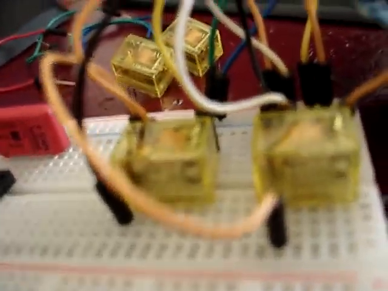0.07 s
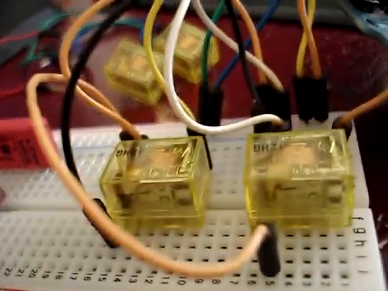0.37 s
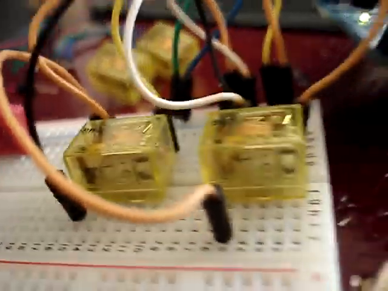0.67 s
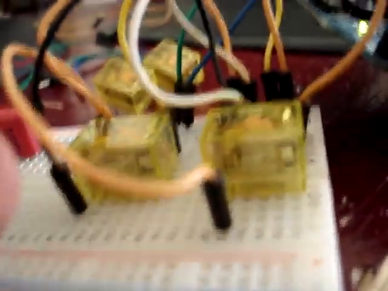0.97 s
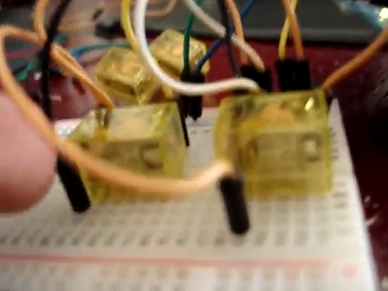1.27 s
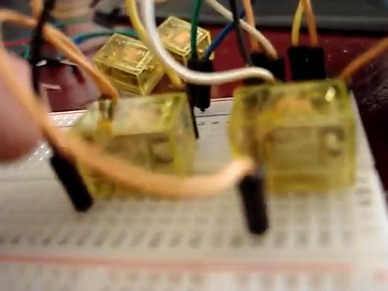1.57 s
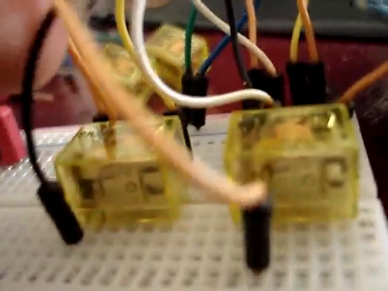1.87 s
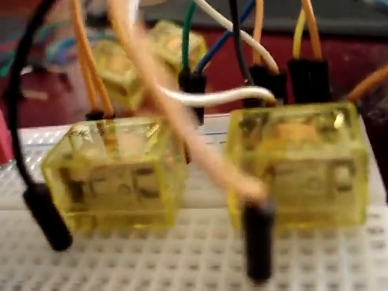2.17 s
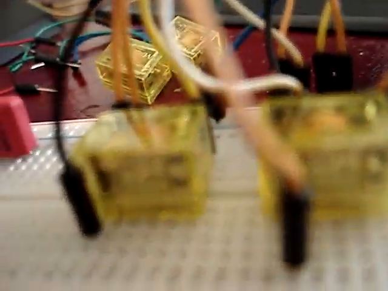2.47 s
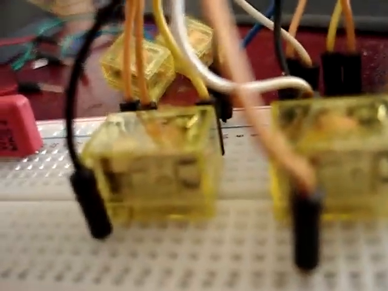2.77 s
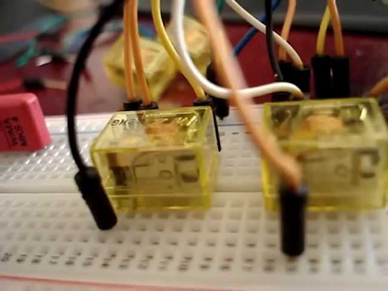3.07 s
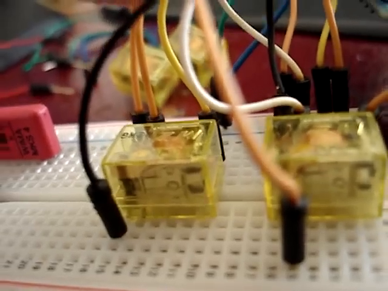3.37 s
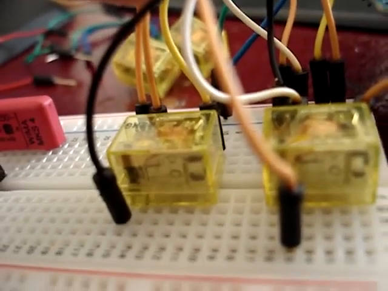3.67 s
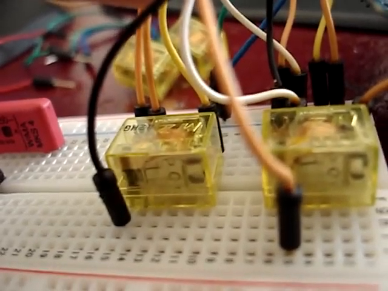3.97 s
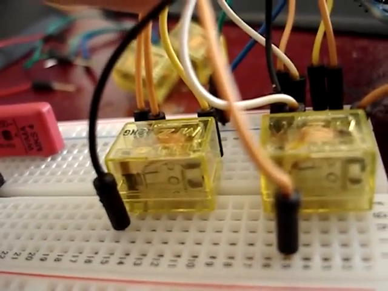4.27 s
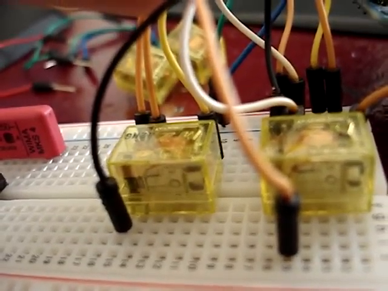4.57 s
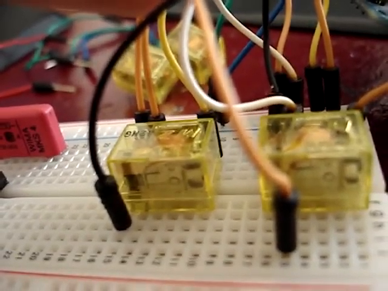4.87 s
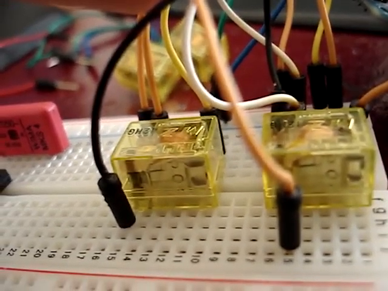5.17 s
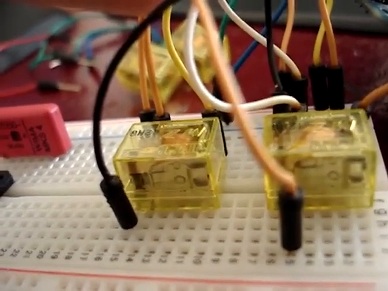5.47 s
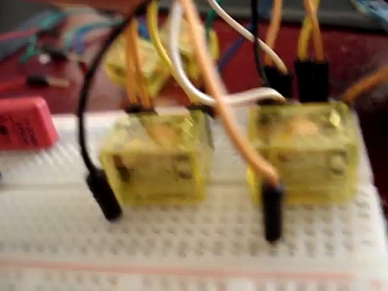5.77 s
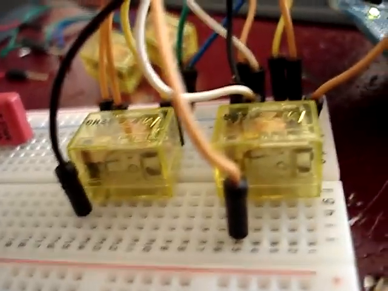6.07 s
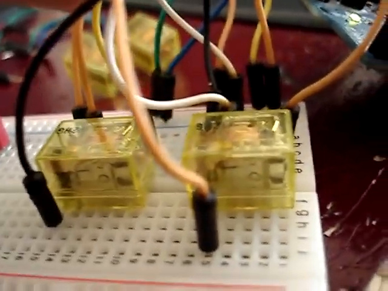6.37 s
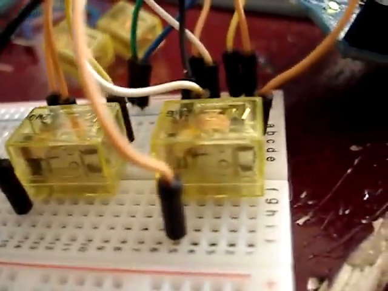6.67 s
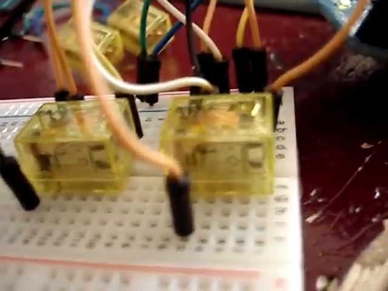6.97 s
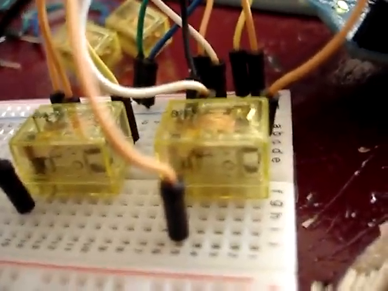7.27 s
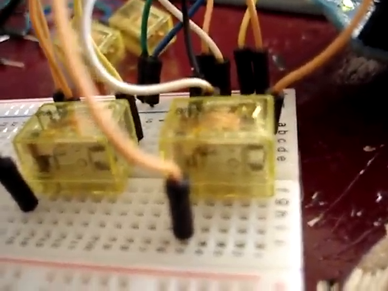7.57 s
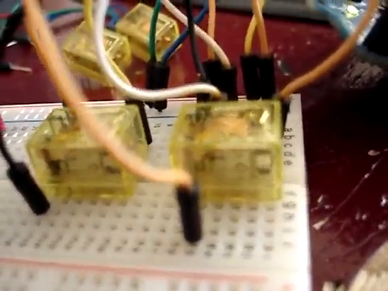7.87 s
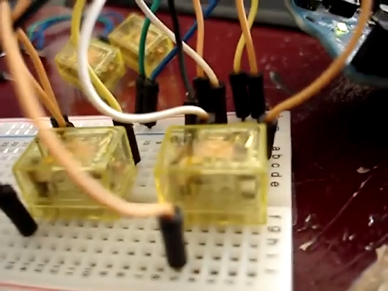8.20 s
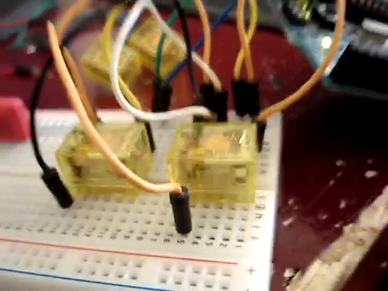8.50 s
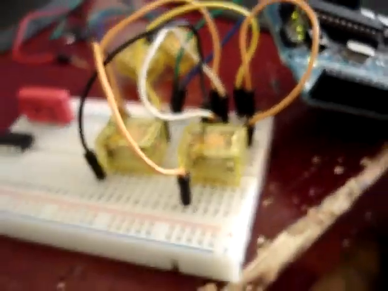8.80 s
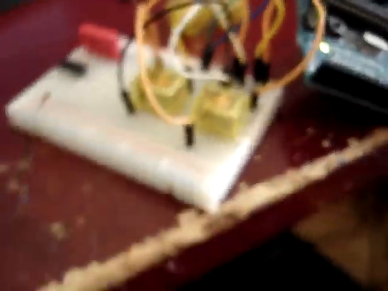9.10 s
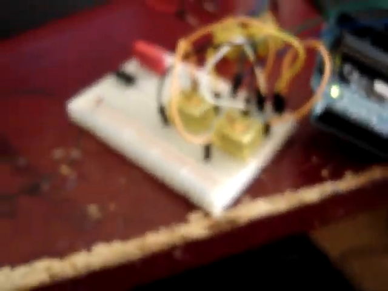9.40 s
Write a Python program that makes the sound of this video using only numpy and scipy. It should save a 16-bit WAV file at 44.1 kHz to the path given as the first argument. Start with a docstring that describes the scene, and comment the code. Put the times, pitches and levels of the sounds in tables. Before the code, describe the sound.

Two small relays switch each other rapidly in a continuous harsh, rattling buzz that stumbles now and then, with one sharp knock near the end.

```python
"""A quiet room, close on a breadboard: two small relays switch each other about 77 times a second.
In every cycle the contacts snap shut and bounce, the armature hits its stop and rattles the plastic
case, and the board knocks. The buzz stumbles whenever an armature sticks, and its colour shifts as the
hand-held microphone moves. Near the end comes one sharp knock; a low rumble lies under it all."""
import sys
import numpy as np
from scipy import signal
from scipy.fft import rfft, irfft
from scipy.io import wavfile

SR = 44100
rng = np.random.default_rng(int(sys.argv[2]) if len(sys.argv) > 2 else 0)


def transcribe(u):
    """Save the signal u as a 16-bit wav file named by the first command-line argument.

    u: samples, shape (n,) or (channels, n), limited to [-1, 1]; the rate is SR.
    q: integer samples, one column per channel.
    """
    v = np.clip(np.atleast_2d(u).T, -1, 1)
    q = np.round(v * 32767).astype(np.int16)
    wavfile.write(sys.argv[1], SR, q)


N = 425124
TIME = np.arange(N) / SR

# Colour of the room tone: frequency_hz, relative_db
RUMBLE_SPECTRUM = [(15, -4.5), (30, 2.5), (48, -7.5), (70, -2.5), (110, -6), (200, -11), (400, -10),
                   (1000, -11), (4000, -19), (10000, -36)]
# The hand-held move: time_s, facing (0 beside the cases, 1 in front), back (0 close, 1 drawn back)
MIC_PATH = [(0, 0.26, 0.32), (.9, 0.059, 0.3), (1.55, 0.13, 0.033), (2.9, 0.53, 0.058), (3.2, 0.68, 0.16),
            (6.8, 0.79, 0.21), (7.7, 0.56, 0.28), (8.2, 0.42, 0.14), (8.8, 0.24, 0.8), (9.25, 0.36, 0.7)]
# The lone knock: start_s, peak_db
KNOCK_HITS = [(9.015, -12)]
# The plastic it rings in: pitch_hz, width_hz, relative_db
KNOCK_RESONANCES = [(900, 350, -14), (1370, 680, -4), (1780, 380, 5.5), (2300, 600, -1), (3600, 270, -6),
                    (4580, 280, 5), (5430, 290, 6)]
# Cycle length while the armatures move freely: time_s, period_ms
FREE_CYCLE = [(0.0, 12.878), (0.71, 12.787), (1.33, 12.749), (1.99, 12.378), (2.25, 13.421), (2.94, 12.231),
              (3.79, 12.467), (4.22, 13.1), (5.16, 13.176), (6.14, 13.331), (7.37, 12.978), (8.5, 13.196),
              (9.64, 13.433)]
# Spells in which an armature sticks: start_s, length_s, lost_per_cycle_ms
STICKING_SPELLS = [(0.21, 0.06, 1.35), (2.35, 0.09, 1.97), (2.65, 0.04, 2.54), (4.52, 0.097, 0.65),
                   (5.15, 0.047, 2.53), (5.32, 0.622, 1.05), (6.56, 0.065, 0.91), (6.89, 0.132, 1.85),
                   (7.86, 0.465, 1.55), (8.66, 0.307, 1.24), (9.09, 0.294, 0.7), (9.45, 0.13, 1.93)]
# How hard the armature shakes board and cases, taken against its median: time_s, level_db
SHAKE_CURVE = [(0.04, -50), (0.52, -50), (1.15, -45), (1.6, -50), (2.72, -52.5), (3.12, -51), (6.1, -49),
               (8.41, -49.5), (8.68, -48.5), (9.58, -46)]
# Body of the breadboard: pitch_hz, width_hz, relative_db, back_boost_db
BOARD_RESONANCES = [(759, 52, 3, 0), (913, 137, 1, 3.5), (1068, 50, 10, 2)]
# The armature's blows in one cycle: delay_ms, strength_db, scatter_ms,
# spot (1 drives neighbouring modes together, -1 against each other)
ARMATURE_HITS = [(-0.82, -10, .01, 0.74), (0.41, 6, .085, -0.21), (.78, -13, .13, 0.36),
                 (2.1, -10, .07, 0.26), (4, -17, .25, 0.8)]
# Ring of the plastic cases: pitch_hz, width_hz, side_gain_db, front_boost_db, back_boost_db
CASE_RESONANCES = [(1546, 150, -22, 7.5, -10), (1805, 127, -3, 0, -3), (2174, 223, -12.5, -11.5, -2.5),
                   (2181, 34, 2.5, -8.5, 0.5), (2628, 330, -6.5, -4, -1.5), (2976, 142, 1, 3, -4),
                   (3193, 128, -16.5, 12, -4.5), (3688, 120, 2, 4, 2), (3705, 270, -10, .5, -0.3),
                   (4142, 89, 8.5, -3.5, 0.5), (4242, 108, -4, 1, -8), (4597, 167, 0, 3.5, -6.5),
                   (4930, 99, -11.5, -7, -2), (5374, 147, 7.5, -6, -3), (5920, 120, -13.5, 11.5, -11),
                   (6040, 111, -19, -12, 17)]
# The case ring near 4 kHz swells and fades: time_s, gain_db
CASE_SWELL = [(0.15, 1), (0.45, -1.5), (1.3, 1), (1.7, -2.5), (2.7, -2), (3.15, 0), (3.7, -3), (4.4, -0.5),
              (7.5, -0.5), (7.9, -2), (9.2, 1.5), (9.5, 4)]
# Faint lead-in, contact snap and bounce: delay_ms, strength_db, scatter_ms, spot (as for the armature)
CONTACT_HITS = [(-2, -16.5, 0.66, 0.38), (-0.9, -10.5, .05, 1), (0.37, 4, .07, 0), (1.37, -0.3, .23, 0)]
# Contact springs: pitch_hz, width_hz, side_gain_db, front_boost_db, back_boost_db, snap_follow_ratio
SPRING_RESONANCES = [(6850, 67, -15, 1, -10, 0.21), (7250, 180, 6, -2.3, 6, 0.47),
                     (7850, 113, -13, -1, -1, 0.25), (8150, 212, 15, 1.9, -2, 0.3),
                     (8810, 215, 1.03, 1.5, 0.5, 0.39), (9012.0, 330, 6, 0, -5, 0.68),
                     (9430, 265, 2.5, 1.7, -2, 1.8), (9720, 180, 14, -9.5, 3.5, 0.88)]
# How hard the contacts snap, taken against its median: time_s, level_db
SNAP_CURVE = [(0.04, -37.5), (1.39, -36), (1.82, -40.5), (2.19, -37.5), (2.8, -44), (3.2, -41.5),
              (3.86, -43.5), (3.97, -38.5), (8.04, -38), (9.07, -37), (9.37, -39.5), (9.58, -37)]


def from_db(db):
    """Decibels to gain."""
    return 10 ** (np.asarray(db) / 20)


def unit_rms(x):
    """Scale to unit power."""
    return x / np.sqrt(np.mean(x ** 2) + 1e-20)


def automation(rows):
    """Each column of a timed curve, sample by sample."""
    times, *columns = np.transpose(rows)
    return [np.interp(TIME, times, column) for column in columns]


def swing(curve):
    """A level curve as dB above or below its median."""
    db, = automation(curve)
    return db - np.median(db)


def wander(count, memory):
    """Random values of unit power, each carrying over into the next few."""
    return unit_rms(signal.lfilter([1], [1, -memory], rng.standard_normal(count)))


def drift(times, per_s):
    """Slow modulation: straight lines between random values, read at the given moments."""
    return np.interp(times * per_s, np.arange(1000), rng.standard_normal(1000))


def band(x, low_hz, high_hz, order):
    """Causal band-pass."""
    return signal.sosfilt(signal.butter(order, [low_hz, high_hz], "band", fs=SR, output="sos"), x)


def resonance(x, hz, width_hz):
    """One ringing mode: two poles, gain 1 at the peak."""
    r = np.exp(-np.pi * width_hz / SR)
    feedback = [1, -2 * r * np.cos(2 * np.pi * hz / SR), r * r]
    return signal.lfilter(np.array([1, 0, -1]) * (1 - r * r) / 2, feedback, x)


def clicks(times, gains):
    """One-sample blows at the given moments."""
    at = np.round(times * SR).astype(int)
    inside = (at >= 0) & (at < N)
    return np.bincount(at[inside], gains[inside], N) + 1e-18


def scattered(cycles, delay_ms, scatter_ms):
    """One loosely timed moment per cycle, in seconds."""
    return cycles + (delay_ms + scatter_ms * rng.standard_normal(len(cycles))) / 1000


def jolts(times, uneven_db):
    """A train of blows, never quite equally strong."""
    return clicks(times, from_db(uneven_db * rng.standard_normal(len(times))))


def bounces(cycles, hits, spread_offset_db, spread_db_per_ms, cycle_db=0):
    """Blows felt by the even and the odd modes; loosely timed bounces also vary most in strength."""
    even, odd = 0, 0
    for delay_ms, db, scatter_ms, spot in hits:
        times = scattered(cycles, delay_ms, scatter_ms)
        spread_db = spread_offset_db + spread_db_per_ms * scatter_ms
        force_db = db + cycle_db + spread_db * rng.uniform(-1, 1, len(cycles))
        blows = clicks(times, from_db(force_db))
        even, odd = even + blows, odd + spot * blows
    return even, odd


def room_rumble(level_db=-57):
    """The bed: steady low noise of the room."""
    hz, db = np.transpose(RUMBLE_SPECTRUM)
    grid_hz = np.maximum(np.arange(N // 2 + 1) * SR / N, 1)
    colour = from_db(np.interp(np.log(grid_hz), np.log(hz), db))
    return from_db(level_db) * unit_rms(irfft(rfft(rng.standard_normal(N)) * colour, N))


def room_tail(direct, t60_s=0.68, predelay_s=0.004, send_db=-19.5):
    """A faint, dull tail from the walls fills the gaps between the clicks."""
    t = TIME[:SR // 2]
    tail = rng.standard_normal(len(t)) * from_db(-60 * t / t60_s) * (t > predelay_s)
    wet = signal.fftconvolve(direct, tail / np.linalg.norm(tail))[:N]
    return from_db(send_db) * band(wet, 78, 4500, order=2)


def knock(rebound_ms=2.18, rebound_db=-13):
    """One hard tap on plastic, with a small rebound."""
    times, db = np.transpose(KNOCK_HITS)
    blows = clicks(times, from_db(db)) + clicks(times + rebound_ms / 1000, from_db(db + rebound_db))
    ring = sum(from_db(mode_db) * resonance(blows, hz, width) for hz, width, mode_db in KNOCK_RESONANCES)
    tap = band(ring, 300, 5500, order=3)
    return tap / np.abs(tap).max() * from_db(db.max())


def switching_times(jitter_ms=0.13, waver_ms=0.28, stumble_share=0.4):
    """The rhythm of the buzz: a little unsteady, slower and more ragged while an armature sticks."""
    free_ms, = automation(FREE_CYCLE)
    lost_ms = sum(ms * ((TIME >= start) & (TIME < start + length))
                  for start, length, ms in STICKING_SPELLS)
    turns = np.cumsum(1000 / (free_ms + lost_ms)) / SR
    times = np.interp(np.arange(1, int(turns[-1]) + 1), turns, TIME)
    stumble_ms = stumble_share * np.interp(times, TIME, lost_ms) * wander(len(times), memory=0.7)
    unsteady_ms = jitter_ms * wander(len(times), memory=0.55) + waver_ms * drift(times, per_s=9)
    return times + (unsteady_ms + stumble_ms - 2.5) / 1000   # opens 2.5 ms into the first cycle


def recoil(cycles, hum_db=-60, thud_db=-63, tap_db=-59.5, panel_db=-68):
    """Each pull-in jolts the relay: hum at the switching rate, a thud, a tap and one low board mode."""
    blows = jolts(cycles - 0.38 / 1000, uneven_db=2.14)
    _, back = automation(MIC_PATH)
    waver_db = 1.2 * drift(TIME, per_s=7.4)
    hum = from_db(hum_db + waver_db) * unit_rms(band(blows, 64, 168.7, order=2))
    thud = from_db(thud_db) * unit_rms(band(blows, 128.5, 361, order=2))
    tap = from_db(tap_db) * unit_rms(band(blows, 707, 1308, order=3))
    panel = from_db(panel_db) * unit_rms(resonance(blows, 391, 93))
    # Drawing back thins the hum, softens thud and tap, and brings up the board mode.
    return from_db(-13 * back) * hum + from_db(-4 * back) * (thud + tap) + from_db(5 * back) * panel


def board_knocks(cycles, shake_db, level_db=-50):
    """The armature's blow reaches the breadboard a little unevenly; its close modes swell and die fast."""
    arrivals = scattered(cycles, delay_ms=0.04, scatter_ms=0.1)
    blows = jolts(arrivals, uneven_db=1.5)
    _, back = automation(MIC_PATH)
    body = sum((-1) ** k * from_db(db + back_db * back) * resonance(blows, hz, width)
               for k, (hz, width, db, back_db) in enumerate(BOARD_RESONANCES))
    return from_db(level_db + shake_db) * unit_rms(band(body, 656, 1005, order=3))


def case_rattle(cycles, shake_db, trim_db=-0.18, shake_share=0.51, vary_db=0.38):
    """The armature hits its stop; each case mode reaches the moving microphone in its own way."""
    blows = bounces(cycles, ARMATURE_HITS, spread_offset_db=-0.13, spread_db_per_ms=17)
    facing, back = automation(MIC_PATH)
    swell_db, = automation(CASE_SWELL)
    rattle = 0
    for k, (hz, width, db, front_db, back_db) in enumerate(CASE_RESONANCES):
        seating_db = vary_db * np.interp(TIME, cycles, rng.standard_normal(len(cycles)))
        heard_db = db + front_db * facing + back_db * back + swell_db * (3500 < hz < 4600)
        rattle += from_db(heard_db + seating_db) * resonance(blows[k % 2], hz, width)
    return from_db(trim_db + shake_share * shake_db) * band(rattle, 720, 8000, order=3)


def sputter(cycles, weak_db=-2.5, chance=0.04, slow_chance=0.2, slow_ms=14):
    """Now and then the contacts close weakly, more readily after a slow cycle: dB for each cycle."""
    slow = np.diff(cycles, prepend=0) > slow_ms / 1000
    return weak_db * (rng.random(len(cycles)) < np.where(slow, slow_chance, chance))


def late_bounces(cycles, strength_db=-2.5, chance=0.36):
    """In some cycles the contacts bounce once more, late."""
    times = scattered(cycles, delay_ms=3.7, scatter_ms=0.45)
    return clicks(times, from_db(strength_db) * (rng.random(len(cycles)) < chance))


def contact_snaps(cycles, trim_db=0.3, waver_db=0.63):
    """A faint bright lead-in, then the contacts snap shut and bounce; their springs ring briefly."""
    force_db = sputter(cycles) + waver_db * drift(cycles, per_s=22)
    even, odd = bounces(cycles, CONTACT_HITS, spread_offset_db=0.3, spread_db_per_ms=10, cycle_db=force_db)
    blows = even + late_bounces(cycles), odd
    facing, back = automation(MIC_PATH)
    snap_db = swing(SNAP_CURVE)
    springs = 0
    for k, (hz, width, db, front_db, back_db, follow) in enumerate(SPRING_RESONANCES):
        heard_db = db + front_db * facing + back_db * back + follow * snap_db
        springs += from_db(heard_db) * resonance(blows[k % 2], hz, width)
    return from_db(trim_db) * band(springs, 3950, 10160, order=3)


def scene():
    """The mono mix: buzzing relays and the knock, over the room's tail and rumble."""
    cycles, shake_db = switching_times(), swing(SHAKE_CURVE)
    clatter = contact_snaps(cycles) + case_rattle(cycles, shake_db)
    body = board_knocks(cycles, shake_db) + recoil(cycles)
    direct = clatter + body + knock()
    return (direct + room_tail(direct) + room_rumble())[None]


def record(dry):
    """The treble drops sharply at an edge; the little that leaks past ends at the cut-off."""
    edge_hz, cutoff_hz, leak_db = 10050, 11117, -22
    passed = signal.fftconvolve(dry, signal.firwin(501, edge_hz, fs=SR)[None], "same")
    leaky = passed + from_db(leak_db) * (dry - passed)
    return signal.fftconvolve(leaky, signal.firwin(101, cutoff_hz, fs=SR)[None], "same")


dry = scene()
out = record(dry)
transcribe(out)
```